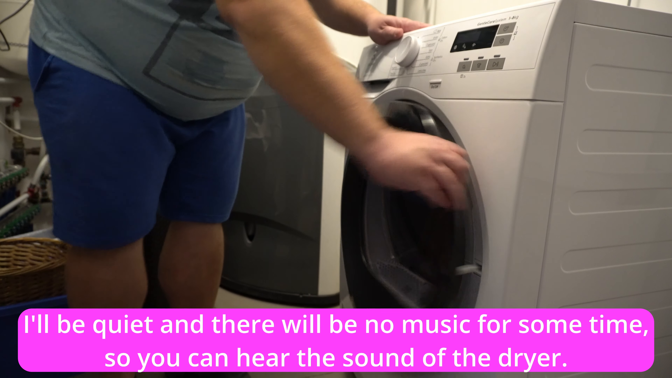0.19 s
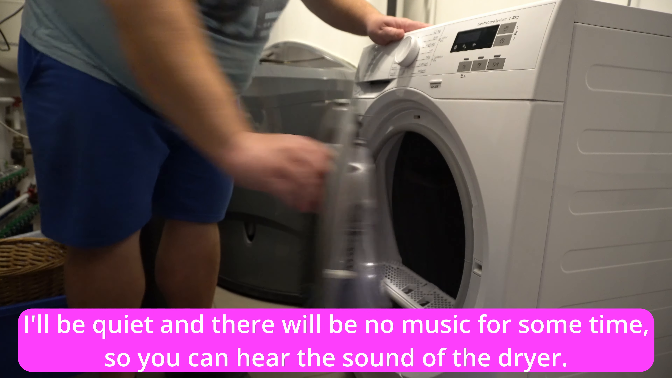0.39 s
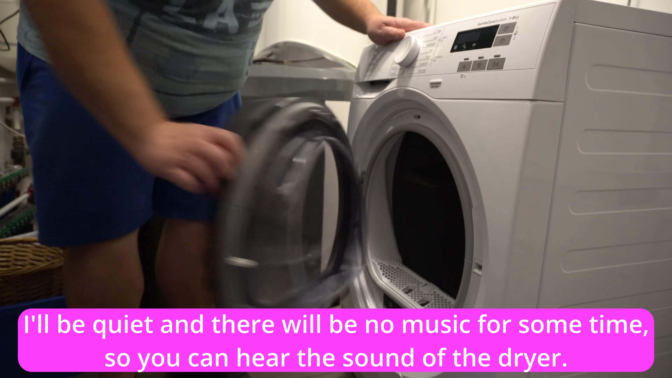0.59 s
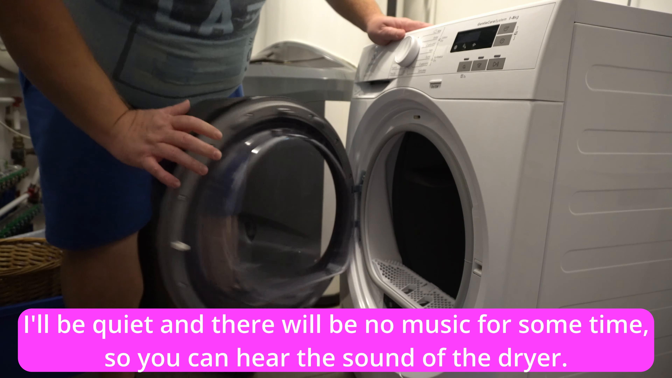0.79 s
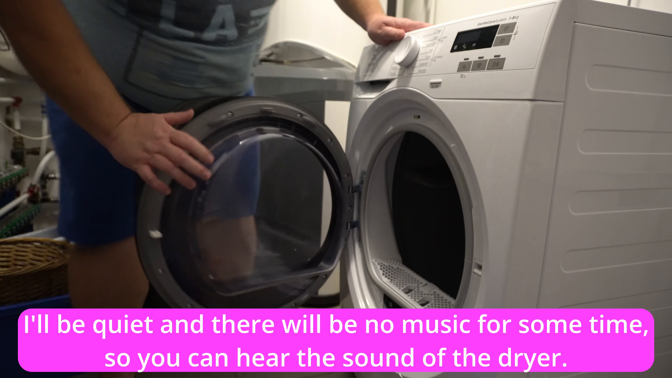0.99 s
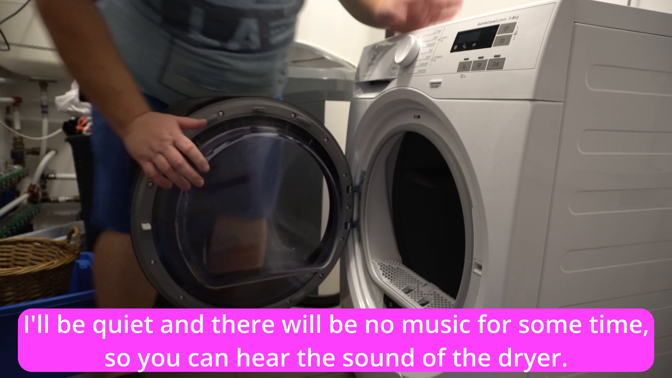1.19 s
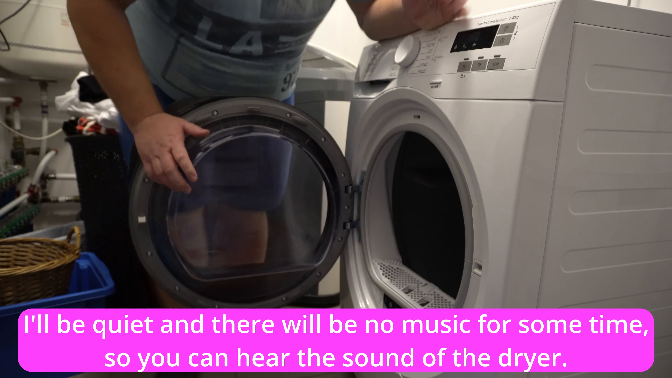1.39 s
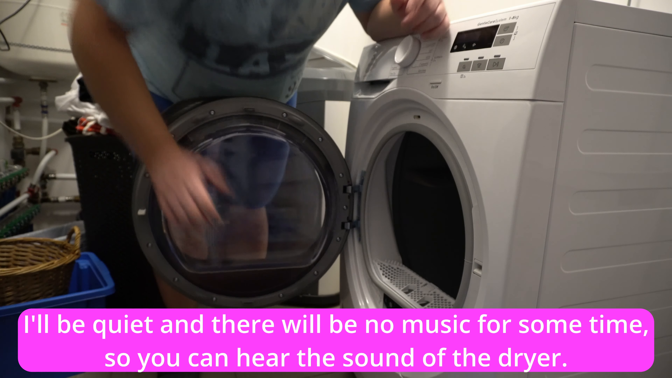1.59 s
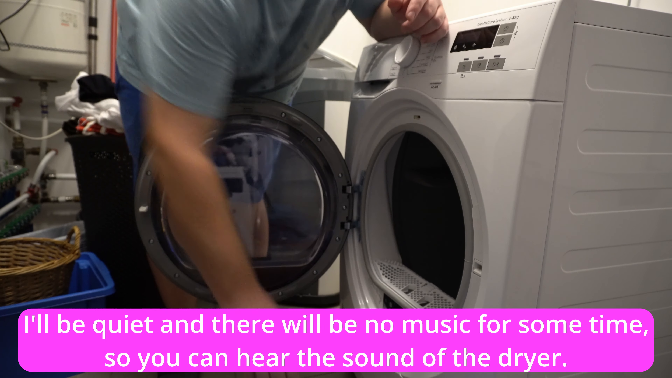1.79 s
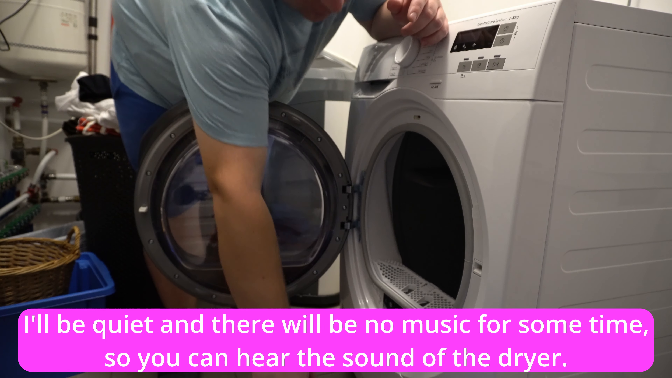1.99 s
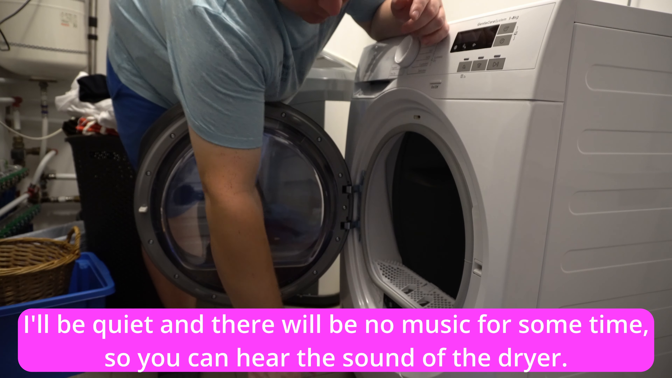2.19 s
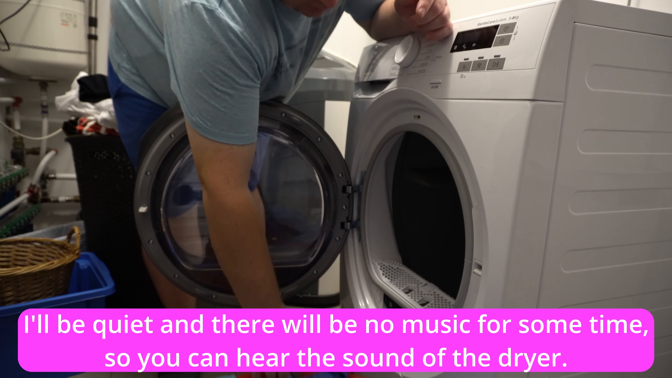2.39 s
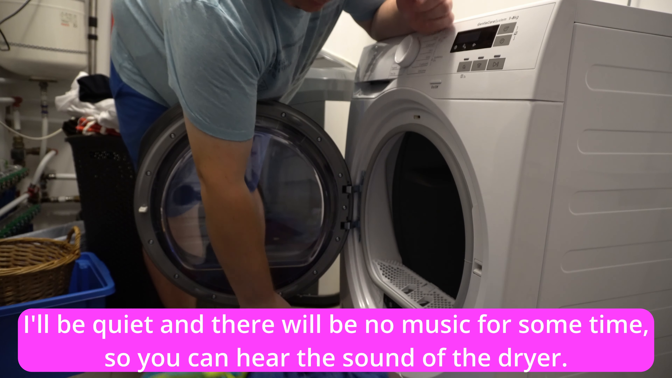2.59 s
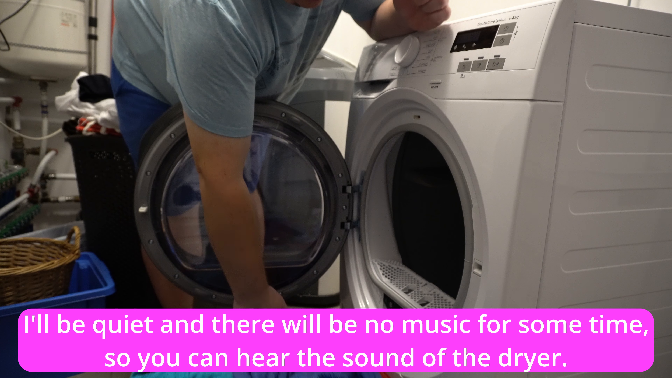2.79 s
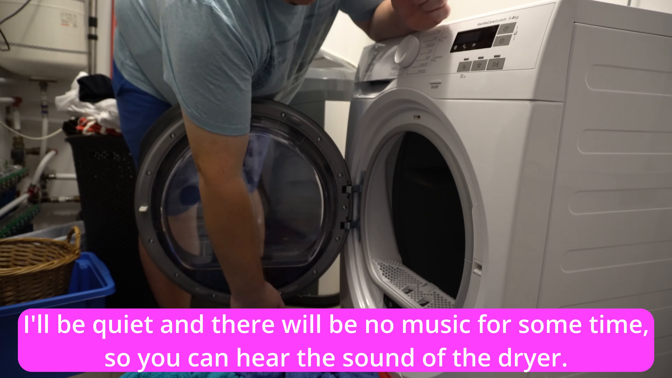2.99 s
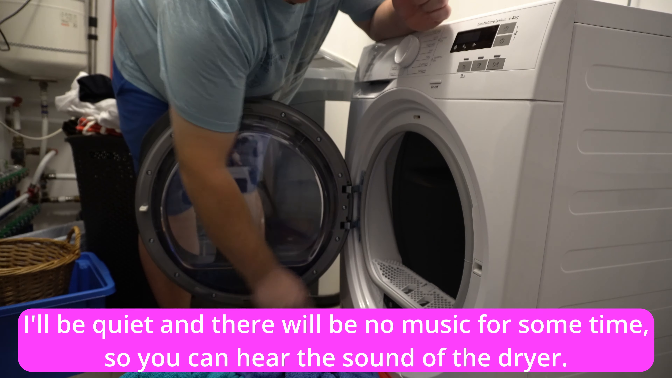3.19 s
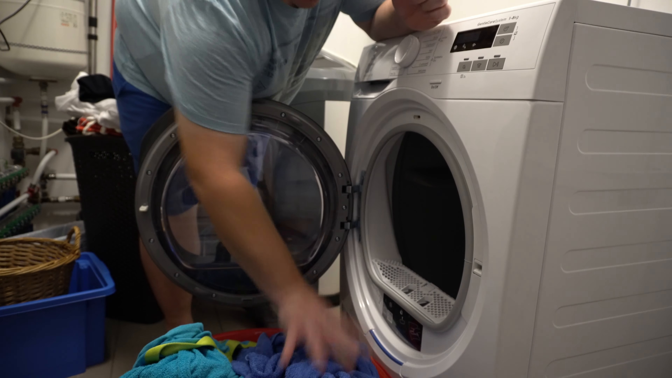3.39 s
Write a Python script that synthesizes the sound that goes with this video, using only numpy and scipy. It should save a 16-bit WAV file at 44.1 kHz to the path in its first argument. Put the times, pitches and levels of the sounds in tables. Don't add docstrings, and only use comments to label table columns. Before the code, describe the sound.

Dryer door unlatches with a sharp clunk, then washing rustles and bumps out of a basket.

```python
import sys
import numpy as np
from scipy import signal
from scipy.fft import rfft, irfft, next_fast_len
from scipy.io import wavfile
from scipy.ndimage import uniform_filter1d, map_coordinates

SR = 44100
rng = np.random.default_rng(int(sys.argv[2]) if len(sys.argv) > 2 else 0)


def amplitude_ratio(level_db):
    exponent = np.asarray(level_db, float) / 20
    return 10 ** exponent


def store_wav(level_fs):
    pcm = np.round(np.clip(np.atleast_2d(level_fs), -1, 1) * 32767)
    wavfile.write(sys.argv[1], SR, pcm.T.astype(np.int16))


N = 149940


def unit(x):
    return x / np.sqrt(np.mean(x ** 2) + 1e-20)


def along(points, hz):
    f, v = np.transpose(points)
    return np.interp(np.log(hz + 1), np.log(f + 1), v)


def curves(rows):
    s, *cols = np.transpose(rows)
    return [np.interp(np.arange(N) / SR, s, c) for c in cols]


def wobble(rate):
    return map_coordinates(rng.standard_normal(N // 100), [np.arange(N) * rate / SR])


def coloured(x, tone):
    m = next_fast_len(len(x) + 8192)
    gain = amplitude_ratio(along(tone, np.fft.rfftfreq(m, 1 / SR)))
    return irfft(rfft(x, m) * gain, m)[:len(x)]


def rustle(tone, patchy_db, grain_db):
    sizes = np.clip(rng.standard_normal(N // 16 + 1), -2, 2).repeat(16)[:N]
    grains = rng.standard_normal(N) * amplitude_ratio(grain_db * sizes)
    z = signal.stft(grains, nperseg=512)[2]
    field = uniform_filter1d(rng.standard_normal(z.shape), size=7, axis=0)
    field = uniform_filter1d(field, size=8, axis=1)
    patchy = signal.istft(z * amplitude_ratio(patchy_db * unit(field)), nperseg=512)[1][:N]
    return unit(coloured(patchy, tone))


def ring(modes, scatter_db=5.0):
    t = np.arange(SR // 2) / SR
    out = np.zeros(len(t))
    for k, (hz, db, t60) in enumerate(modes):
        decay = amplitude_ratio(db + scatter_db * rng.normal() - 60 * t / t60)
        out += (-1) ** k * decay * np.sin(2 * np.pi * hz * t)
    return out


def add(track, s, sound):
    part = track[round(s * SR):][:len(sound)]
    part += sound[:len(part)]


def hum():
    # frequency in Hz, level in dB per Hz.
    room_air = [(170, -4), (650, -5), (870, 0), (1050, -13.5), (2150, -11.5), (2400, -20.5), (7000, -26),
                (15500, -43.5)]
    # frequency in Hz, level in dB per Hz.
    low_rumble = [(18, -30), (33, 2), (42, -4.5), (80, -4), (140, -11), (220, -74)]
    hum_hz, phase_rad = 100.021, -0.54
    hum_db, sway_db, air_db, rumble_db = -39.5, 0.36, -51.5, -54.5
    tone = np.sqrt(2) * np.sin(2 * np.pi * hum_hz * np.arange(N) / SR + phase_rad)
    air = rustle([(60, -61)] + list(room_air), patchy_db=1.06, grain_db=0.5)
    rumble = rustle(low_rumble, patchy_db=1.5, grain_db=5)
    return amplitude_ratio(hum_db + sway_db * wobble(6.5)) * tone + amplitude_ratio(air_db) * air + amplitude_ratio(rumble_db) * rumble


def cloth_strokes():
    # start in seconds, length in seconds, level in
    # dB, brightness in dB.
    strokes = [(-.05, 0.1, -58.5, 8), (.058, .112, -54.5, 7.5), (.185, 0.12, -50, -5),
               (.25, 0.39, -70.5, 3.5), (.88, 0.14, -88, -16), (0.67, 0.1, -64, 6.5),
               (0.798, 0.043, -57.5, 11.5), (1.06, 0.059, -63, -6), (1.166, 0.17, -64.5, 1),
               (1.25, 0.21, -61.5, 10), (1.43, 0.1, -56, 5), (1.56, 0.17, -64, -4), (1.737, 0.17, -58, -3),
               (1.885, 0.22, -61, 8.5), (2.23, 0.14, -41.5, 10), (2.394, 0.023, -31.5, 8.5),
               (2.798, 0.045, -40, 8.5), (2.945, 0.072, -48.5, 6.5)]
    lift = (3.12, .4, -56, -14)
    # frequency in Hz, level in dB.
    body_tone = [(300, -44), (900, -2), (2000, 2.5), (4000, 0.5), (7000, -7.5), (10000, -24)]
    # frequency in Hz, level in dB.
    sheen_tone = [(2500, -31), (5000, 1.5), (8000, -1.5), (12000, -8), (15500, -24)]
    rise_s, fall_s = 0.014, 0.016
    s, length, db, bright_db = np.transpose([*strokes, lift])[..., None]
    t = np.arange(N) / SR
    rise = 1 + np.tanh((t - s) / rise_s / 2)
    fall = 1 - np.tanh((t - s - length) / fall_s / 2)
    on = rise * fall / 4
    body = (amplitude_ratio(db + 5.5) * on).sum(0) * rustle(body_tone, patchy_db=2.0, grain_db=-2.5)
    sheen = (amplitude_ratio(db - 5.0 + bright_db) * on).sum(0) * rustle(sheen_tone, patchy_db=1.5, grain_db=-1.5)
    return amplitude_ratio(0.9 * wobble(25)) * (body + sheen)


def ticks():
    # start in seconds, level in dB, pitch in Hz, t60 in seconds.
    clicks = [(0.173, -35, 1110, 0.074), (0.186, -41, 1180, 0.15), (0.207, -35, 2020, 0.077),
              (1.219, -42, 1850, 0.029), (1.22, -44.5, 3200, 0.02), (2.052, -35.5, 610, 0.048),
              (2.115, -52, 2500, 0.034), (2.237, -29.5, 3900, 0.034), (2.466, -23, 5000, 0.026),
              (2.134, -33, 3520, 0.025), (2.458, -23, 1330, 0.078), (3.1, -30.5, 990, 0.024),
              (3.178, -41.5, 870, 0.13), (0.2363, -39, 7540, .06)]
    width, top_db = 1.2, -28
    out, t = np.zeros(N), np.arange(SR // 10) / SR
    for s, db, hz, t60 in clicks:
        tone = [(hz / 2, -30), (hz / width, -9), (hz, 0), (hz * width, -9), (hz * 2, top_db), (15000, -55)]
        noise = unit(coloured(rng.standard_normal(len(t)), tone))
        add(out, s, amplitude_ratio(db - 60 * t / t60) * noise)
    return out


def door():
    # start in seconds, level in dB, blow length in seconds, snap over the cabinet in dB.
    contacts = [(.207, -29, 0.00013, 6), (.2125, -19, 0.00046, 5), (.2175, -30, 0.00023, 3),
                (.225, -23.5, 0.00054, 10), (.229, -23.5, 0.00021, 20), (.233, -32, 0.00023, 18),
                (.2355, -30, .00002, 16.5), (.237, -25, .00002, 15.5), (.2395, -20, 0.000055, 5.5),
                (.242, -24, 0.000031, -2), (.245, -25, 0.000023, 4), (.2485, -20, 0.00006, 12),
                (.252, -27, .0001, 12), (.2555, -24, 0.000069, 3.5), (.259, -29.5, 0.0003, 15),
                (.263, -22, .0002, 5), (.277, -31, 0.00031, 1), (.292, -38, 0.00037, 6),
                (.303, -43, 0.00049, 12)]
    # frequency in Hz, level in dB, t60 in seconds.
    cabinet = [(39.4, -19, 0.34), (68, -8.5, 0.15), (180, -5, 0.027), (271, -3.5, 0.051),
               (361, -7.5, 0.053), (402, -9, .05), (532, -1.5, 0.073), (640, -3, 0.034), (813, -2.5, .1),
               (1058, -4, 0.05), (1220, -4, 0.016), (1460, -5, 0.036), (1770, 2, 0.043), (2110, -1, 0.029)]
    # frequency in Hz, level in dB.
    snap_tone = [(400, -5), (1800, -4), (2900, -10), (3650, -3), (5100, -1), (6200, -2.5), (8600, -17),
                 (15500, -32)]
    snap_t60_s, snap_rise_s = 0.045, 0.0005
    out, t = np.zeros(N), np.arange(SR // 2) / SR
    for s, db, length_s, snap_db in contacts:
        u = t[:SR // 20] / max(length_s, 1 / SR)
        push = u * np.exp(-u)
        noise = unit(coloured(rng.standard_normal(len(t)), snap_tone))
        snap = noise * amplitude_ratio(snap_db - 60 * t / snap_t60_s) * (1 - np.exp(-t / snap_rise_s))
        body = ring(cabinet, scatter_db=4) + snap
        add(out, s, amplitude_ratio(db) * signal.fftconvolve(body, push / push.sum()))
    return out


def basket():
    # start in seconds, level in dB, pitch in Hz, t60 in seconds.
    bumps = [(0.211, -32, 270, 0.044), (.222, -17.5, 170, 0.085), (0.234, -29, 68, 0.29),
             (1.91, -38, 536, 0.2), (3.138, -30, 395, 0.03), (3.164, -29, 398, 0.053),
             (1.97, -23.5, 162, 0.044), (1.982, -23, 201, 0.017), (2.044, -26, 190, 0.044),
             (2.051, -25, 300, 0.02), (2.162, -37, 259, 0.19), (2.266, -32, 406, 0.1),
             (2.295, -27, 185, 0.05), (2.4, -40, 180, .06), (2.334, -28.5, 168, 0.086),
             (2.461, -22.5, 367, 0.1), (2.484, -23.5, 277, 0.25), (2.496, -21, 139, 0.053),
             (2.512, -16.5, 175, 0.058), (2.554, -20, 146, 0.082), (2.559, -25.5, 540, 0.076),
             (2.645, -31, 272, 0.12), (2.723, -28, 280, 0.13), (3.003, -34.5, 283, 0.064),
             (2.74, -31, 540, 0.11), (2.83, -35, 540, 0.15), (2.909, -42, 543, 0.14),
             (2.99, -41, 555, 0.11), (2.201, -34.5, 365, 0.089), (2.319, -29, 383, 0.074)]
    # start in seconds, level in dB.
    slips = [(3.1067, -27.5), (3.1112, -25.5), (3.1150, -24), (3.1187, -30.5), (3.122, -25), (3.1259, -24),
             (3.1285, -24), (3.1333, -31)]
    # frequency in Hz, level in dB, t60 in seconds.
    rim = [(190, -9.5, 0.042), (285, -3, 0.025), (377, -4, 0.084), (605, -3, 0.084), (730, -1.5, 0.016),
           (840, 0.5, 0.024), (1024, 1.5, 0.031), (1314, -2.5, 0.02), (1720, -18, 0.05), (2170, -16, 0.038)]
    spread, rise_s = 0.11, 0.0011
    out, t = np.zeros(N), np.arange(SR // 2) / SR
    for s, db, hz, t60 in bumps:
        modes = [(hz, 0, t60), (hz * (1 + spread), -6, t60 / 2), (hz * 2, -12, t60 / 2)]
        soft_start = 1 - np.exp(-t / rise_s)
        add(out, s, amplitude_ratio(db) * ring(modes, scatter_db=0.8) * soft_start)
    for s, db in slips:
        add(out, s, amplitude_ratio(db) * ring(rim, scatter_db=2.7))
    return out


def heap():
    # time in seconds, effort in dB, basket wall's share in dB.
    drag = [
        (2.112, -48, 5),
        (2.138, -38, -6.5),
        (2.2, -37.5, -1),
        (2.3, -36.5, 1.5),
        (2.46, -29, -5.5),
        (2.51, -32, -1.5),
        (2.79, -38.5, -0.5),
        (3.03, -46, 2),
        (3.079, -48, 1),
    ]
    # frequency in Hz, level in dB per Hz.
    cloth_tone = [(300, -23), (700, -17), (1170, -6), (2300, -9), (4300, -10.5), (6500, -14),
                  (10100, -26.5), (15500, -48)]
    # frequency in Hz, level in dB per Hz.
    sheen_tone = [(3000, -40), (4500, -5.5), (6500, -10), (10000, -8.5), (15500, -26)]
    # frequency in Hz, level in dB.
    wall_tone = [(90, -18), (150, -2), (280, -1), (420, -7), (550, -5.5), (1100, -3.5), (1600, -9),
                 (2600, -34.5)]
    sheen_db, sheen_grows, full_effort_db = -6.5, 0.66, -32.5
    reach_s, reach_length_s, reach_db, edge_s = 1.777, 0.25, -48, 0.036
    effort_db, share_db = curves([(2.05, -90, 0), *drag, (3.2, -90, 0)])
    cloth = amplitude_ratio(0.3 * wobble(22.77)) * rustle(cloth_tone, patchy_db=1.76, grain_db=1.0)
    sheen_gain = amplitude_ratio(sheen_db + sheen_grows * (effort_db - full_effort_db))
    sheen = sheen_gain * rustle(sheen_tone, patchy_db=4.5, grain_db=2.5)
    wall = amplitude_ratio(2.0 * wobble(30.12)) * rustle(wall_tone, patchy_db=0.2, grain_db=0.5)
    t = np.arange(N) / SR - reach_s
    reach = amplitude_ratio(reach_db) / (1 + np.exp(-t / edge_s)) / (1 + np.exp((t - reach_length_s) / edge_s))
    return amplitude_ratio(effort_db) * (cloth + sheen) + (amplitude_ratio(effort_db + share_db) + reach) * wall


def walls(x):
    # frequency in Hz, t60 in seconds.
    room_t60 = [(100, 0.54), (500, 0.35), (2000, 0.28), (6000, 0.31), (9000, 0.29), (14000, 0.36)]
    delay_s = 0.004
    hz, t, z = signal.stft(rng.standard_normal(SR // 2), SR, nperseg=256)
    fade = amplitude_ratio(-60 * t / along(room_t60, hz)[:, None])
    tail = signal.istft(z * fade, SR, nperseg=256)[1]
    late = np.pad(x, (round(delay_s * SR), 0))
    return signal.fftconvolve(late, tail / np.linalg.norm(tail))[:N]


def scene():
    near = [(cloth_strokes(), -6.5), (door() + ticks(), -5), (basket(), -8.5), (heap(), -6.5)]
    mix = hum() + sum(x + amplitude_ratio(wet_db) * walls(x) for x, wet_db in near)
    return np.array([mix, mix])


def roll_off(x):
    return signal.sosfilt(signal.butter(12, 16620, fs=SR, output="sos"), x)


def record(dry):
    # frequency in Hz, level in dB.
    band = [(15, -12), (45, 0), (15650, 0), (15750, -90)]
    # frequency in Hz, level in dB.
    side_tone = [(3000, -70), (4500, -27), (8000, -26), (15000, -21)]
    clip_top, knee = 0.5, 4
    clipped = dry[0] / (1 + abs(dry[0] / clip_top) ** knee) ** (1 / knee)
    mid = coloured(clipped, band)
    side = coloured(np.roll(mid, 300), side_tone)
    return roll_off(np.array([mid + side, mid - side]))


dry = scene()
out = record(dry)
store_wav(out)
```